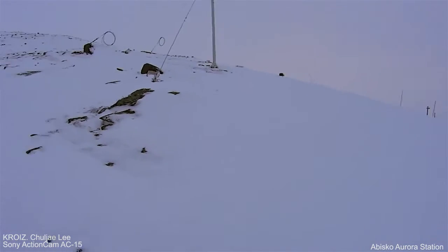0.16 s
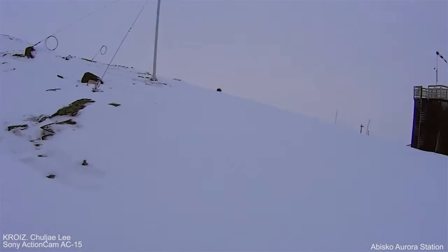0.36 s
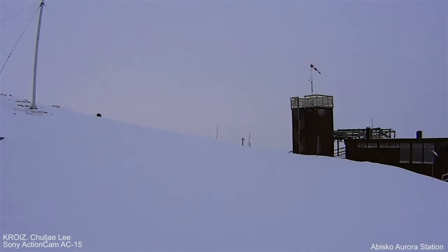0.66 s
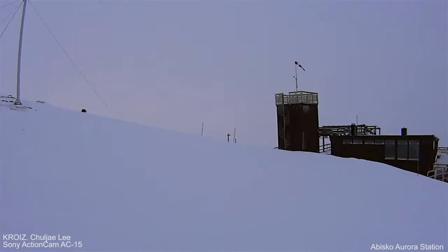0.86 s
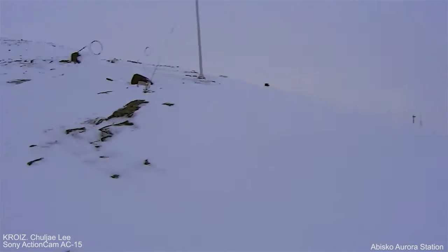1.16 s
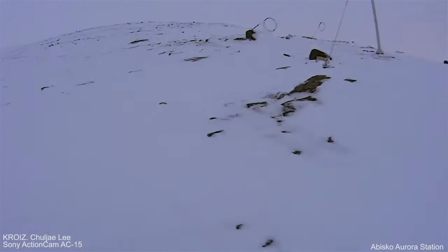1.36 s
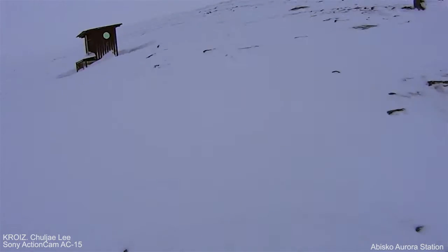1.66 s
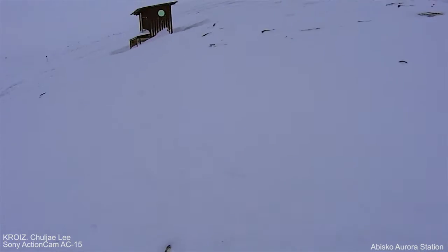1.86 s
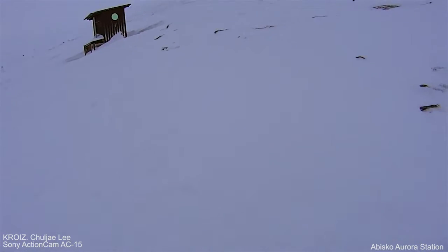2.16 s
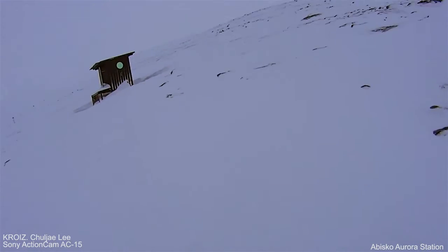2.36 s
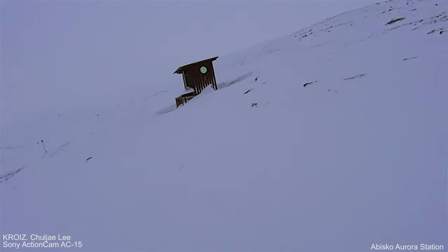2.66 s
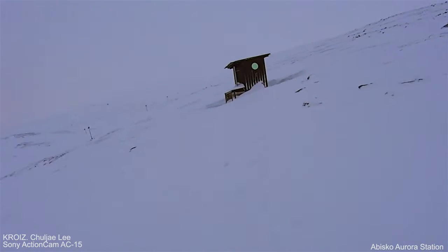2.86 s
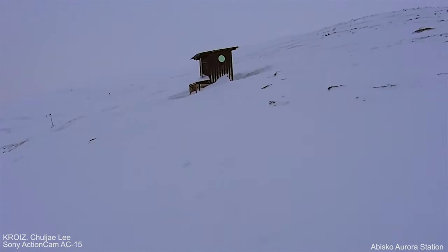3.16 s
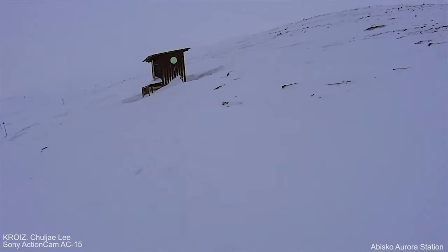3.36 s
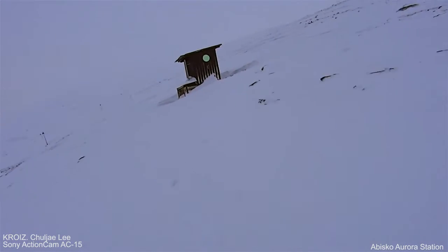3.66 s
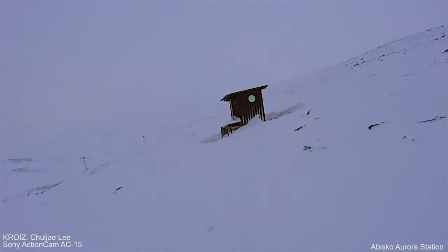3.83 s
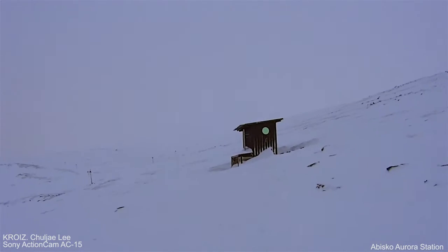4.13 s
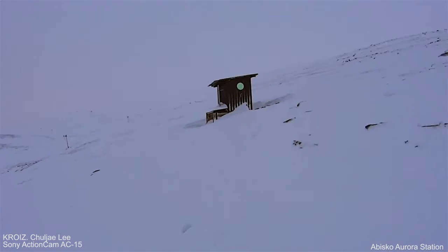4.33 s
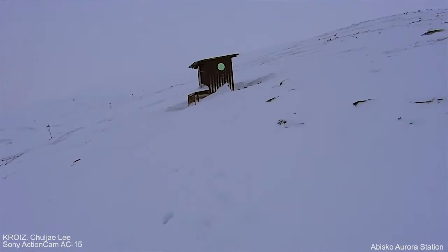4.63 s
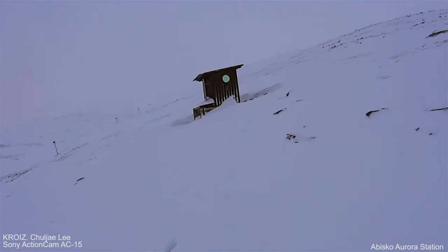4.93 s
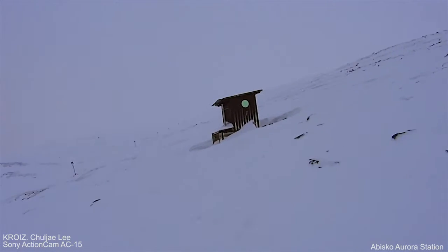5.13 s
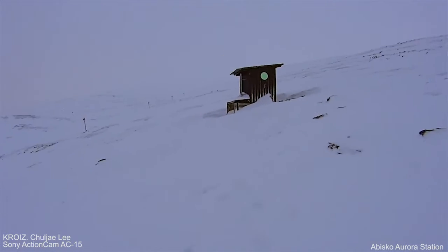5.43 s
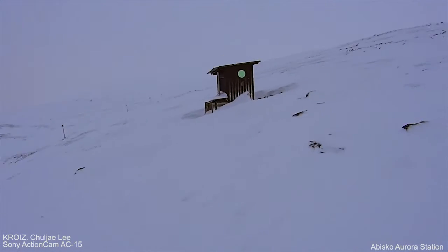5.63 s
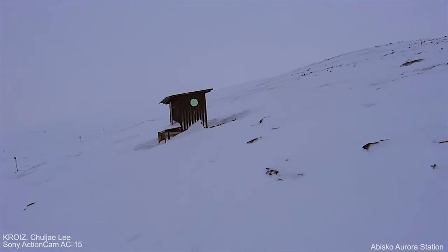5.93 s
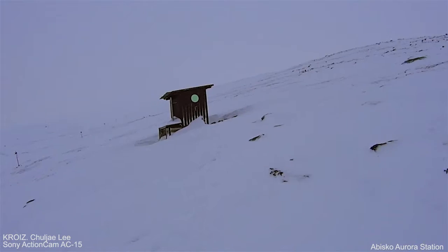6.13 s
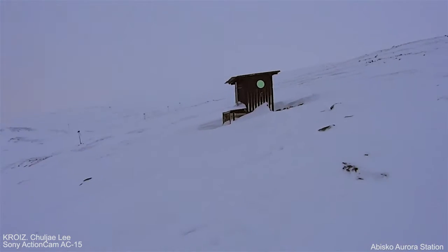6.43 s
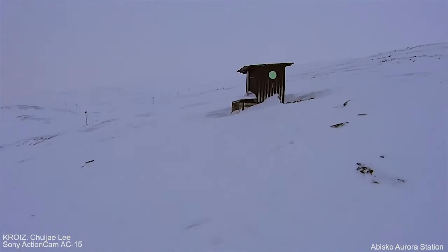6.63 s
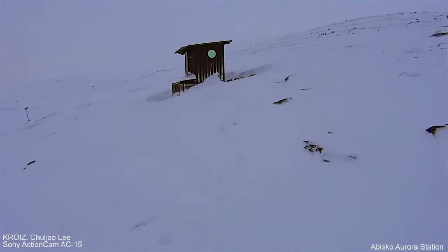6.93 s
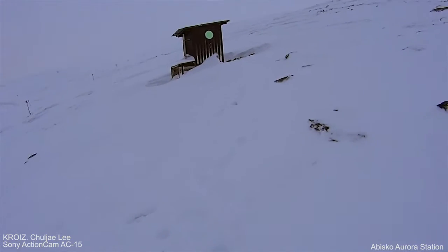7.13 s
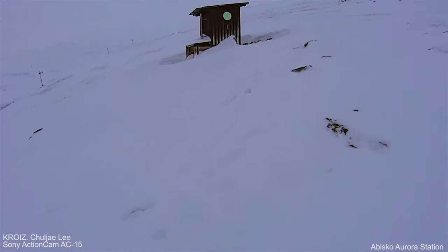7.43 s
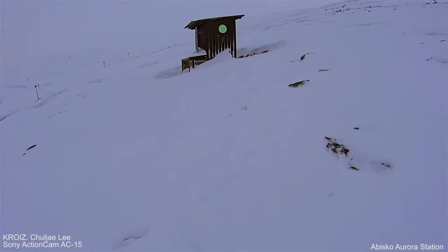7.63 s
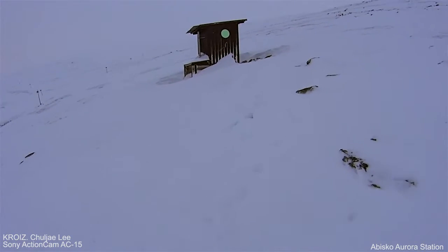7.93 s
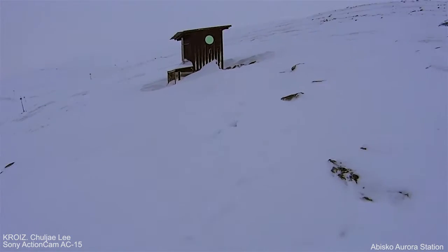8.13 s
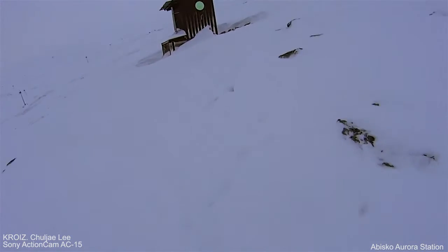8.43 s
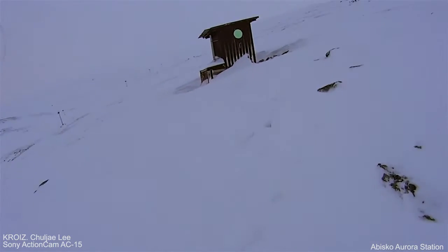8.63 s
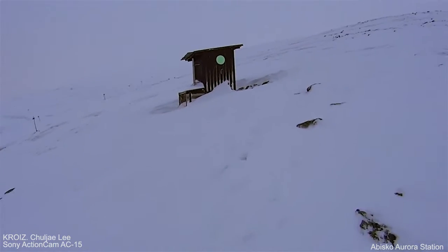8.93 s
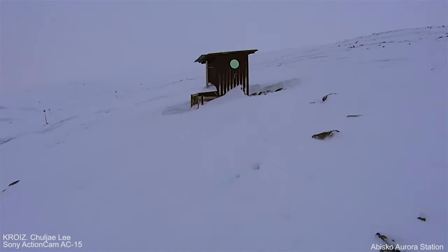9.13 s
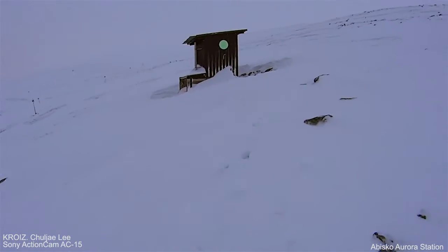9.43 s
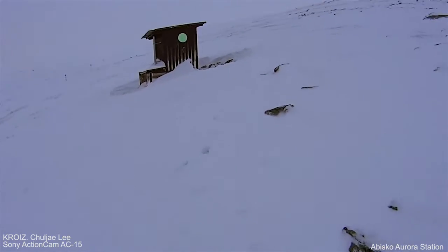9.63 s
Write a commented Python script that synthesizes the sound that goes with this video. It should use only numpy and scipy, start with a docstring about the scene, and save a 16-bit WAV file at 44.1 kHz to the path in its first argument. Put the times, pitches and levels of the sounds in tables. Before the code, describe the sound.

A small camera in a plastic housing is carried over open snow; the sound is dry, close and dull at the very top, with faint steady hiss and soft clothing rustle throughout. Light crunching shuffles occur at 0-0.9 s, then a quieter pause with small icy ticks from about 1.5 s. Firmer boot crunches with deep soft thuds land near 2.3, 2.9 and 3.5 s, some with a tiny squeak, followed by slower, softer presses at 4.1 and 4.4 s. From 4.7 to 5.4 s fingers knock hard and hollowly on the housing and drag roughly across it, by far the loudest event. Crunches return at 5.5-7.2 s, strongest near 6.0, with a sharp tick at 5.8 s and another at 7.3 s. From 7.4 to 8.3 s the palm scuffs quietly with low rumble, ending in a dull bump. Last crunches fall around 8.5, 9.1 and 9.7 s among scattered ticks.

```python
"""Boots thud and crunch slowly over a snowy slope, heard by a small camera in a plastic housing.
Each step is swelling filtered noise for breaking snow and a low sine thud; clothes rustle as coloured noise.
Icy grains tick on the housing as short bursts through resonances; a few narrow noise swells squeak.
Halfway, fingers knock and slide over the housing; later the grip shifts with low scuffing and a dull bump."""
import sys
import numpy as np
from scipy import signal
from scipy.fft import rfft, irfft
from scipy.io import wavfile
from scipy.ndimage import uniform_filter1d

SR = 44100
rng = np.random.default_rng(int(sys.argv[2]) if len(sys.argv) > 2 else 0)


def unload_audio(sound):
    """Save the sound as a 16-bit wav file, at the path given as the first command line argument."""
    columns = np.transpose(np.atleast_2d(sound))
    # keep every value between -1 and 1, then stretch to whole-number steps
    steps = np.round(np.clip(columns, -1, 1) * 32767)
    wavfile.write(sys.argv[1], SR, steps.astype(np.int16))


N = 431298  # length in samples


def undb(db):
    """Decibels to gain."""
    return 10 ** (np.asarray(db) / 20)


def unit(x):
    """Scale to rms 1."""
    return x / np.sqrt(np.mean(x ** 2))


def crest(x):
    """Equal strength at both ports, peak 1."""
    x = x / x.std(1, keepdims=True)
    return x / np.abs(x).max()


def along(points, hz):
    """Read (Hz, value) points on a log-frequency axis."""
    point_hz, value = np.transpose(points)
    return np.interp(np.log(hz + 1), np.log(point_hz), value)


def band(x, lo_hz, hi_hz):
    """Gentle band-pass."""
    sos = signal.butter(2, [lo_hz, min(hi_hz, 0.45 * SR)], "band", fs=SR, output="sos")
    return signal.sosfilt(sos, x)


def ring(x, hz, width_hz):
    """One resonance, gain 1 at its centre."""
    return signal.lfilter(*signal.iirpeak(hz, hz / width_hz, fs=SR), x)


def walk(rate_hz):
    """Smooth random drift of rms 1, heading for a new value at the given rate."""
    hold = int(SR / rate_hz)
    held = np.repeat(rng.standard_normal(N // hold + 1), hold)
    return unit(uniform_filter1d(held, hold)[:N])


def grains(rate_hz, spread_db):
    """Tiny random slips of very unequal size, reaching the two ports with unrelated signs."""
    happens = rng.random(N) < rate_hz / SR
    size = happens * undb(spread_db * np.minimum(rng.exponential(size=N), 4))
    return unit(size * rng.standard_normal((2, N)))


def colour(pair, spectrum, side_db):
    """Give two unrelated signals a spectrum and blend them into left and right."""
    # likeness of left and right before side_db: hz, correlation
    likeness = [(50, 0.98), (130, 0.94), (290, 0.32), (580, -0.12), (900, 0.17), (1450, 0.39),
                (2000, -0.082), (3100, -0.15), (4700, 0.083), (7000, 0.13), (11000, 0.59)]
    hz = np.arange(N // 2 + 1) * SR / N
    alike = np.clip(along(likeness, hz), -1, 1)
    coloured = rfft(pair) * undb(along(spectrum, hz))
    mid, side = irfft(coloured * np.sqrt([1 + alike, 1 - alike]), N)
    side = undb(side_db) * side
    return np.array([mid + side, mid - side])


def housed(x):
    """Housing cavities resonate, each lifting the ports' common sound and their difference separately."""
    # housing cavities: centre_hz, width_hz, common_lift_db, difference_lift_db
    cavities = [(334, 55, 2.5, 4.5), (724, 120, 2, -5), (1417, 47, 4.5, -4), (1693, 120, 4.5, -17),
                (3130, 300, 4.5, 4), (4650, 630, 4, 0.5)]
    mid, side = (x[0] + x[1]) / 2, (x[0] - x[1]) / 2
    for hz, width_hz, mid_db, side_db in cavities:
        mid = mid + (undb(mid_db) - 1) * ring(mid, hz, width_hz)
        side = side + (undb(side_db) - 1) * ring(side, hz, width_hz)
    return np.array([mid + side, mid - side])


def per_band(x, lo_hz, hi_hz):
    """Scale so that the given band of the left-right mean has rms 1."""
    return x / band(x.mean(0), lo_hz, hi_hz).std()


def add(out, s, x):
    """Mix a short sound in at time s."""
    i = max(int(s * SR), 0)
    out[:, i:i + x.shape[1]] += x[:, :N - i]


def contact(t, chatter_s, scatter, touch=5.9):
    """A sharp touch followed by a brief decaying chatter, partly different at each port."""
    shared, own = rng.standard_normal(len(t)), rng.standard_normal((2, len(t)))
    return (t == 0) * touch + (shared + scatter * own) * np.exp(-t / chatter_s)


def swell(s, half_s):
    """A bell-shaped swell: its place in the scene, its time from the top and its shape."""
    near = np.arange(max(int((s - 0.25) * SR), 0), min(int((s + 0.25) * SR), N))
    age = near / SR - s
    return near, age, np.exp(-0.5 * (age / half_s) ** 2)


def footsteps(crunch_trim_db=4.5, thud_hz=37, thud_half_s=0.034, jolt_delay_s=0.0097, uneven_db=1.7):
    """Snow crystals break in a swell under heel, then sole; the jolt travels up the arm as a low thud."""
    # footfalls and shuffles, levels before the trims below: top_s, half_length_s, crunch_db, thud_db
    steps = [(0.054, 0.018, -54.5, -57), (0.474, .03, -73, -53), (0.719, 0.024, -55.5, -60),
             (0.88, 0.024, -73, -57), (2.266, 0.026, -48.5, -40), (2.915, 0.019, -48.5, -43),
             (3.539, 0.025, -58.5, -45), (4.075, 0.066, -59.5, -46), (4.407, 0.054, -51.5, -64),
             (5.451, 0.017, -49.5, -55), (5.693, 0.035, -52, -69), (6.009, 0.013, -44, -53),
             (6.16, 0.022, -60.5, -71), (6.521, 0.043, -52.5, -47), (7.075, 0.018, -59.5, -56),
             (7.236, 0.0086, -46, -55), (8.452, 0.019, -54.5, -55), (8.559, 0.022, -53, -55),
             (9.11, 0.029, -59, -50), (9.744, 0.018, -49.5, -45)]
    # relative spectrum of snow packing under a boot: hz, level_db
    crunch_colour = [(71, -23), (120, -12), (162, -3), (327, 4.5), (495, -4), (765, 1.5), (1270, -7),
                     (1460, -1), (2770, -13), (3220, -9.5), (4040, -22), (4700, -11), (6360, -22),
                     (8280, -21), (11000, -34), (14300, -63), (22000, -120)]
    # the heel, then the softer sole: lag_s, crunch_change_db, thud_change_db
    phases = ((0, 0, 0), (0.1, -13.5, -11))
    press, jolt = np.zeros(N), np.zeros(N)
    for s, half_s, crunch_db, thud_db in steps:
        for lag_s, softer_db, lighter_db in phases:
            near, age, shape = swell(s + lag_s, half_s)
            press[near] += undb(crunch_db + softer_db) * shape
            near, age, shape = swell(s + lag_s + jolt_delay_s, thud_half_s)
            turns = thud_hz * rng.uniform(0.57, 1.44) * age + rng.random()  # random pitch and phase
            jolt[near] += undb(thud_db + lighter_db) * shape * np.sin(2 * np.pi * turns)
    slips = grains(rate_hz=9000, spread_db=1.7) * undb(uneven_db * walk(110))
    snow = unit(housed(colour(slips, crunch_colour, side_db=-3)))
    rough = rng.standard_normal(N) + 0.18 * rng.standard_normal((2, N))
    shudder = unit(band(rough, 39.0, 72.5)) * np.abs(jolt)
    return undb(crunch_trim_db) * press * snow + 1.6 * jolt + 0.5 * shudder


def rustle(cloth_trim_db=0.52, uneven_db=1, patter_trim_db=-8, build_s=2.4):
    """Clothes brush softly; fine grains patter on the housing as the walker moves."""
    # briskness of movement in two stretches, before the trims: time_s, level_db
    briskness = [
        [(0.0, -60.5), (0.4, -63), (0.65, -60.5), (0.96, -64.5), (1.18, -63), (1.55, -58), (2.16, -62),
         (2.36, -56), (2.5, -61.5), (3.82, -59), (3.99, -56.5), (4.65, -57)],
        [(5.45, -54), (5.65, -56), (5.82, -55), (6.52, -61), (7.06, -60.5), (7.3, -56.5), (7.77, -58.5),
         (8.05, -55), (8.35, -54.5), (8.89, -59), (9.5, -62), (9.77, -62.5)],
    ]
    # relative spectrum of the cloth: hz, level_db
    cloth_colour = [(15, -34), (25, 12), (64, -1.5), (192, -6.5), (303, -4.5), (531, -6), (740, -7.5),
                    (1260, -5.5), (1670, -2.5), (2100, -12), (3160, -13.5), (3590, -19), (4870, -15),
                    (6120, -21.5), (11000, -24.5), (14300, -91), (22000, -120)]
    time_s = np.arange(N) / SR
    motion = undb(np.interp(time_s, *np.concatenate(briskness).T))
    slips = grains(rate_hz=18000, spread_db=2) * undb(uneven_db * walk(25))
    cloth = per_band(housed(colour(slips, cloth_colour, side_db=2.5)), 804, 2740)
    specks = grains(rate_hz=40, spread_db=2.5)
    shell = ring(specks[0], 4860, 410) + 0.2 * ring(specks[0], 1580, 300)
    patter = unit(shell + 0.5 * band(specks, 2500, 9200))
    onset = np.clip(time_s / build_s, 0, 1) ** 2  # the patter builds up as the walk begins
    return motion * (undb(cloth_trim_db) * cloth + undb(patter_trim_db) * onset * patter)


def hiss(hiss_db=-61, whine_hz=6800, whine_db=-77):
    """The microphones' own steady hiss, with a faint narrow whine of filtered noise."""
    # relative spectrum of the hiss: hz, level_db
    hiss_colour = [(100, 3.5), (400, 1), (1200, -3), (2500, -2.5), (4000, -5), (7000, -2.5), (11000, -10)]
    whine = unit(ring(rng.standard_normal(N), whine_hz, 60))
    noise = unit(colour(rng.standard_normal((2, N)), hiss_colour, side_db=0.0))
    return undb(hiss_db) * noise + undb(whine_db) * whine


def small_ticks(count=60, from_s=1.3, colour_spread_db=4):
    """Smaller grains, as rows like those of the large ones, land at random once the walk is under way."""
    times = from_s + (N / SR - from_s) * (np.arange(count) + rng.random(count)) / count
    spread = rng.standard_normal((count, 3)) * [2, colour_spread_db, colour_spread_db]
    typical = [-44.5, -15.5, -17]  # main ring, hollow ring, bright edge in dB
    return list(np.column_stack([times, spread + typical]))


def ticks(hollow_trim_db=5, shell_trim_db=5, bright_trim_db=9, pan_spread_db=3):
    """Each icy grain rings the housing for a few milliseconds; the shell rings along with hollow and edge."""
    # larger grains: start_s, main_ring_peak_db (before panning),
    # hollow_ring_db, bright_edge_db (both relative to the main ring, before the trims)
    large_ticks = [(0.83, -47.5, -6, -10), (1.462, -37, -12, -23), (1.7466, -38, -24, -17),
                   (1.8562, -34.5, -14, -21), (1.885, -39.5, -12, -9), (1.955, -38.5, -5, -10),
                   (2.2538, -34, -11, -13.5), (2.3113, -26.5, -12.5, -22), (2.75, -40.5, -11, -12),
                   (3.1844, -35, -13, -23), (3.238, -41, -20, -7.5), (3.301, -38, -14, -24),
                   (3.315, -39, -16, -22), (3.327, -36, -10.5, -22), (3.423, -37, -17, -24),
                   (3.773, -37.5, -22, -15), (3.937, -34.5, -4.5, -11), (3.9435, -34.5, -14, -11),
                   (4.131, -39, -9, -10), (5.825, -16, -20, -22), (5.8346, -33, -8, -13),
                   (5.8411, -23, -16.5, -17.5), (5.8524, -30.5, -16, -9.5), (6.039, -28, -4, -21.5),
                   (6.181, -38, -14, -21), (6.2093, -39, -23, -14), (6.3153, -32, -15, -10.5),
                   (6.519, -36, -28, -13), (6.855, -29.5, -13.5, -24), (7.1087, -35.5, -15, -25),
                   (7.146, -37.5, -11, -18), (7.3277, -21.5, -17, -18), (8.053, -28, -5, -20),
                   (8.251, -32, -8.5, -11), (8.311, -32.5, -5, -9), (8.556, -29, -12.5, -17.5),
                   (9.2181, -28, -18, -22), (9.2643, -32, -11.5, -13), (9.4551, -31.5, -17, -24),
                   (9.6359, -37, -6.5, -20)]
    out, t = np.zeros((2, N)), np.arange(1024) / SR
    for s, db, hollow_db, bright_db in large_ticks + small_ticks():
        touch = contact(t, chatter_s=0.0017, scatter=1.0)
        main_hz = 4850 * rng.uniform(0.97, 1.03)
        main_ring = crest(ring(band(touch, 3100, 7800), main_hz, 500))
        hollow_ring = crest(ring(band(touch, 690, 1780), 1600, 214))
        shell_ring = crest(ring(band(touch, 1960, 2250), 3240, 290))
        edge = crest(band(touch, 7760, 9670))
        tick = main_ring + undb(hollow_trim_db + hollow_db) * hollow_ring
        tick = tick + undb(shell_trim_db + (hollow_db + bright_db) / 2) * shell_ring
        tick = tick + undb(bright_trim_db + bright_db) * edge
        pan_db = pan_spread_db * rng.standard_normal()  # left minus right
        add(out, s, tick * undb(db + np.array([[pan_db], [-pan_db]]) / 2))
    return out


def squeaks(squeak_hz=1520, width_hz=330):
    """Packed snow rubs under the sole in a narrow band."""
    # short squeaks: top_s, half_length_s, level_db
    squeak_rows = [(2.216, 0.0061, -41), (2.885, .013, -48.5), (3.474, 0.012, -49), (6.011, .008, -43)]
    shear = np.zeros(N)
    for s, half_s, db in squeak_rows:
        near, age, shape = swell(s, half_s)
        shear[near] += undb(db) * shape
    rub = rng.standard_normal(N) + 0.51 * rng.standard_normal((2, N))
    return shear * unit(ring(band(rub, 1230, 2160), squeak_hz, width_hz))


def stroke(start_s, length_s, attack_s, release_s, build_db=0):
    """A rub sets in, changes by build_db while it lasts and dies away when the skin lets go."""
    age = np.arange(N) / SR - start_s
    attack = np.clip(age / attack_s, 0, 1)
    build = undb(build_db * (np.clip(age / length_s, 0, 1) - 1.0))
    return attack * build * np.exp(-np.clip((age - length_s) / release_s, 0, 20))


def rubbing(rows, rest, attack_s, release_s, build_db):
    """Gains of body, hollow ring and treble over a resting contact: firmness moves weight to the treble."""
    power = np.tile(rest ** 2, (3, 1))
    for start_s, length_s, db, firm_db in rows:
        part_gain = undb(db + firm_db * np.array([[-1], [0], [1]]))
        power += (part_gain * stroke(start_s, length_s, attack_s, release_s, build_db)) ** 2
    return np.sqrt(power)


def friction(strokes, spectrum, slips, low_hz, high_hz, trims_db, shift_db):
    """Dense slips ring the housing in three bands, each with its own gain and random drift of shift_db."""
    rub = housed(colour(slips, spectrum, side_db=-1.0))
    low, below = (signal.sosfiltfilt(signal.butter(4, hz, fs=SR, output="sos"), rub)
                  for hz in (low_hz, high_hz))
    parts = low, below - low, rub - below
    return sum(undb(db + shift_db * walk(70)) * gain * unit(part)
               for db, gain, part in zip(trims_db, strokes, parts))


def slide(uneven_db=1.25, rest_db=-43):
    """Fingers drag over the housing, catching and letting go, with a light brush between slides."""
    # finger slides, level before the band trims: start_s, length_s, level_db, firmness_db
    slides = [(4.69, 0.052, -37, 6), (4.782, 0.082, -34, 5), (4.938, 0.074, -30.5, -3),
              (5.012, 0.082, -28, -0.5), (5.1, 0.061, -25.5, 1), (5.205, 0.094, -33, -2.5),
              (5.298, 0.069, -34, -2.5), (5.372, 0.023, -40.5, 8)]
    # relative spectrum of the sliding: hz, level_db
    slide_colour = [(35, -10), (60, -10), (199, -9.5), (336, -4), (555, -7.5), (769, -2.5), (1240, -6.5),
                    (1450, 0.5), (2670, -15.5), (3170, -12), (3700, -26), (4700, -19), (5470, -26),
                    (7590, -30), (11000, -43.5), (14300, -74), (22000, -120)]
    slips = grains(rate_hz=20000, spread_db=1.3) * undb(uneven_db * walk(130))
    rest = undb(rest_db) * stroke(4.69, 0.694, attack_s=0.015, release_s=0.018)
    strokes = rubbing(slides, rest, attack_s=0.019, release_s=0.015, build_db=2)
    return friction(strokes, slide_colour, slips, low_hz=1130, high_hz=2420,
                    trims_db=(-2.5, 1.5, -4), shift_db=0.0)


def knocks(push_hz=55, push_s=0.0067, push_lag_s=0.0007, rock_db=-1, direct_db=-9):
    """A finger lands: the softer the contact, the duller the ring; the case gives way and swings back."""
    # finger knocks: start_s, ring_peak_db, contact_cutoff_hz, case_push_db
    knock_rows = [(4.696, -28, 4000, -40), (4.7314, -5, 7000, -23.5), (4.7604, -5.5, 2300, -18),
                  (4.786, -20, 303, -33), (4.9146, -16, 1870, -31.5), (4.980, -12.5, 1500, -42),
                  (5.0026, -4.5, 2590, -40), (5.151, -26, 1710, -36), (5.278, -17, 1700, -43),
                  (7.428, -30.5, 393, -34.5), (8.3146, -10, 630, -32)]
    # plastic housing modes, relative level within a knock: centre_hz, width_hz, level_db
    modes = [(210, 370, -3.5), (337, 61, -1.5), (700, 400, -8.5), (985, 56, 6), (1430, 200, 12),
             (1640, 110, 12), (2970, 350, 5), (4500, 510, 3), (7600, 720, -2), (8350, 900, -22)]
    out, t = np.zeros((2, N)), np.arange(4096) / SR
    opposite = np.array([[1], [-1]])  # opposite signs at the two ports
    for k, (s, db, soft_hz, push_db) in enumerate(knock_rows):
        chatter_s = 0.003 * (1000 / soft_hz) ** 0.59  # softer contacts last longer
        touch = band(contact(t, chatter_s, scatter=1.0, touch=11.7), 66, soft_hz)
        body = undb(direct_db) * touch
        body = body + sum(undb(mode_db) * ring(touch, hz, width_hz) for hz, width_hz, mode_db in modes)
        rock = undb(rock_db) * ring(touch[0], 300, 70) * opposite  # air swings between the ports
        side = (-1) ** k  # thumb and fingers push from opposite sides
        give = t / push_s * np.exp(1 - t / push_s)
        push = side * np.sin(2 * np.pi * push_hz * (t + push_lag_s * opposite)) * give
        add(out, s, undb(db) * crest(body + rock) + undb(push_db) * push)
    return out


def grip(uneven_db=2.5, rest_db=-60, rumble_db=-55, rumble_uneven_db=3.5):
    """The palm scuffs softly as it takes a new hold, rubbing on between scuffs, and the whole case rumbles."""
    # palm scuffs, level before the band trims: start_s, length_s, level_db, firmness_db
    scuffs = [(7.418, 0.05, -49, -3.5), (7.52, 0.066, -52, 3.5), (7.655, 0.046, -47.5, -1),
              (7.822, 0.043, -47, 5), (7.88, 0.055, -48, 0.5), (7.96, .07, -49, -2),
              (8.033, 0.052, -41, -1.5), (8.133, 0.028, -41, 1), (8.19, 0.036, -52.5, -10.5),
              (8.235, 0.03, -47, -3), (8.305, 0.039, -44.5, 2)]
    # relative spectrum of the scuffing: hz, level_db
    scuff_colour = [(18, -33), (30, 1.5), (270, -2), (314, 3.5), (554, -10.5), (977, -8), (1080, -15.5),
                    (1420, -10.5), (2100, -18), (3200, -20), (3620, -30), (4870, -24), (5510, -32),
                    (7410, -30), (11000, -48), (14300, -69), (22000, -120)]
    slips = grains(rate_hz=6000, spread_db=0) * undb(uneven_db * walk(45))
    hold = stroke(7.42, 0.89, attack_s=0.017, release_s=0.044)
    strokes = rubbing(scuffs, undb(rest_db) * hold, attack_s=0.016, release_s=0.016, build_db=-3)
    rumble = hold * undb(rumble_uneven_db * walk(30)) * unit(band(rng.standard_normal(N), 63, 230))
    # the colour shifts as the skin rolls
    scuffing = friction(strokes, scuff_colour, slips, low_hz=457, high_hz=2050,
                        trims_db=(0, 0.5, -7.5), shift_db=0.94)
    return scuffing + undb(rumble_db) * rumble


def scene():
    """Open snow gives no echo: all sources arrive dry."""
    return footsteps() + squeaks() + ticks() + knocks() + slide() + grip() + rustle() + hiss()


def record(dry, top_hz=11100):
    """The camera cuts the top with a steep low-pass."""
    return signal.sosfilt(signal.ellip(10, 0.2, 70, top_hz, fs=SR, output="sos"), dry)


dry = scene()
out = record(dry)
unload_audio(out)
```